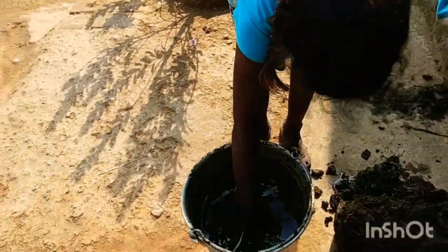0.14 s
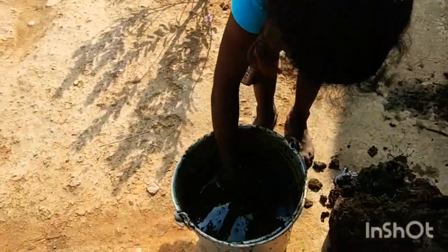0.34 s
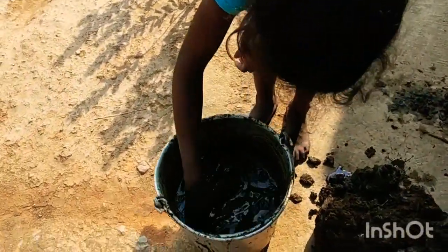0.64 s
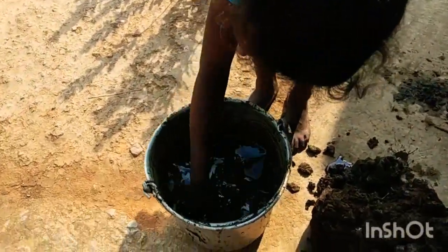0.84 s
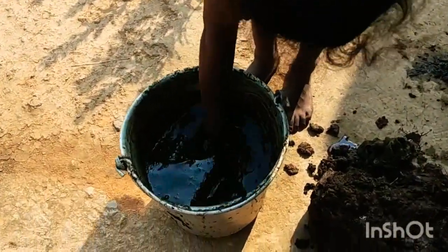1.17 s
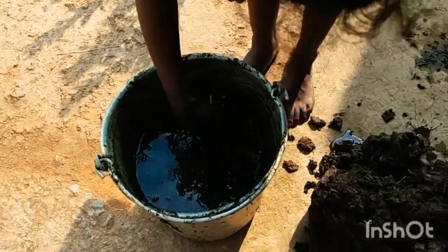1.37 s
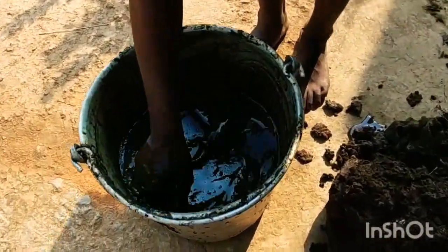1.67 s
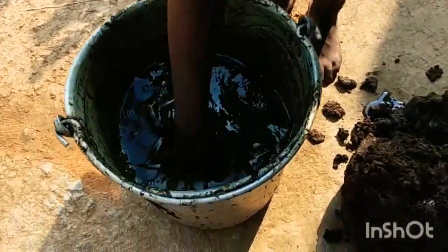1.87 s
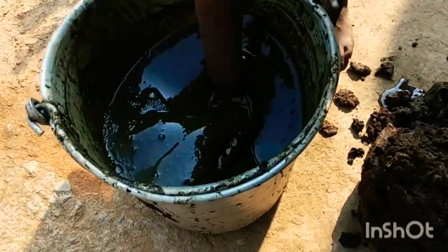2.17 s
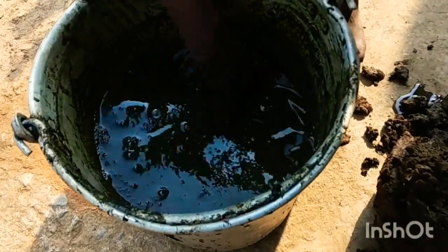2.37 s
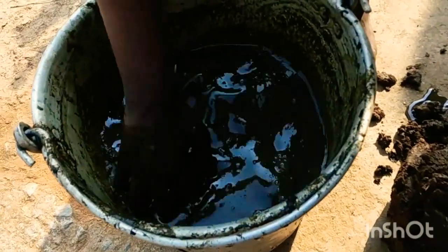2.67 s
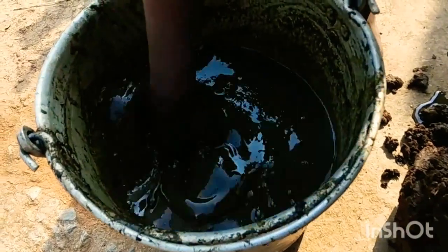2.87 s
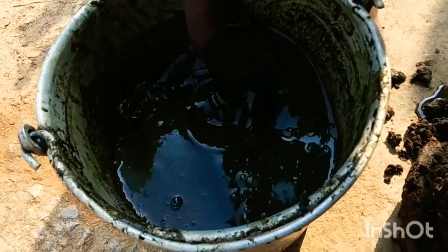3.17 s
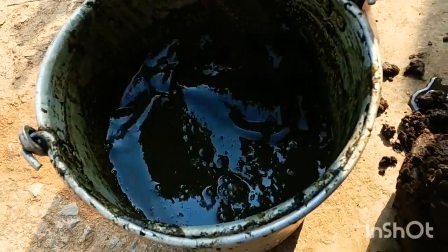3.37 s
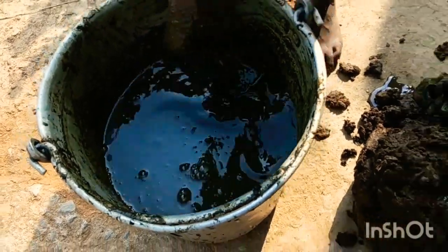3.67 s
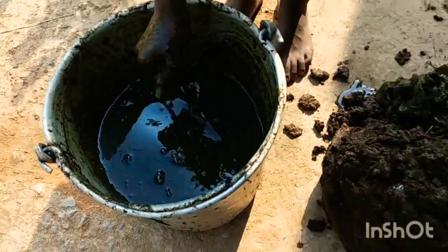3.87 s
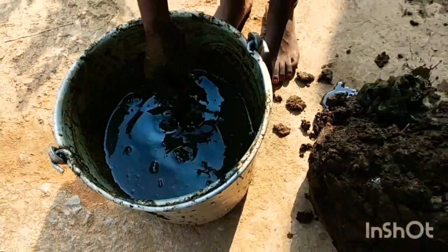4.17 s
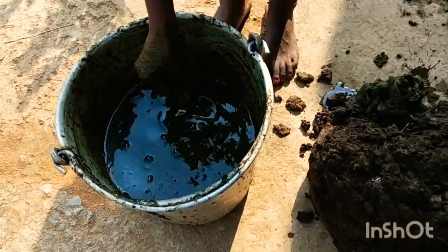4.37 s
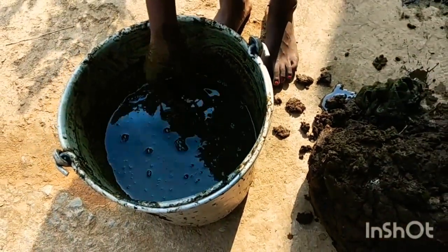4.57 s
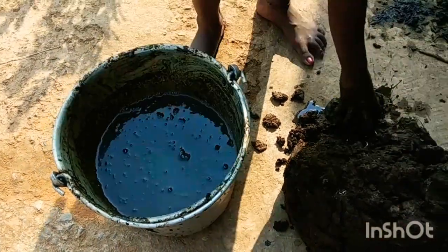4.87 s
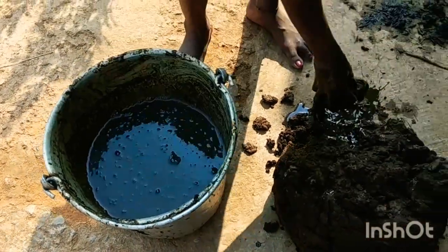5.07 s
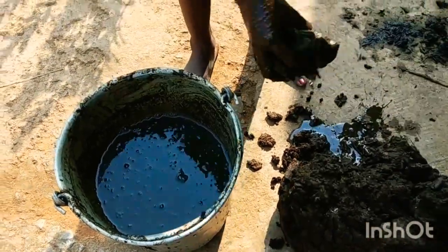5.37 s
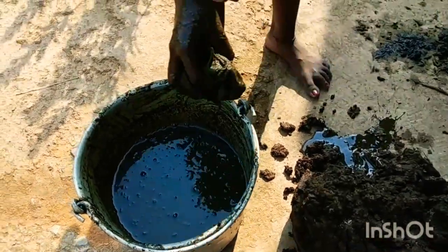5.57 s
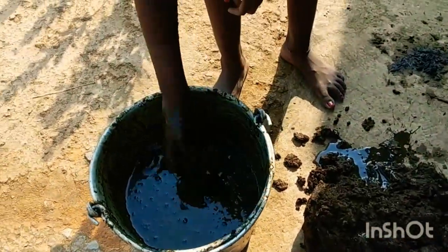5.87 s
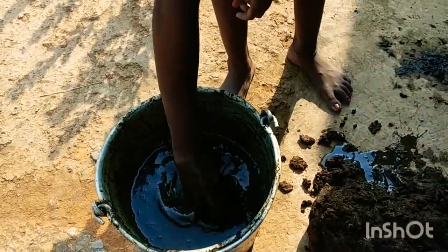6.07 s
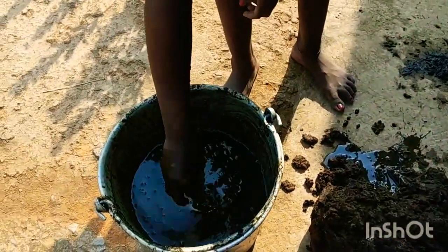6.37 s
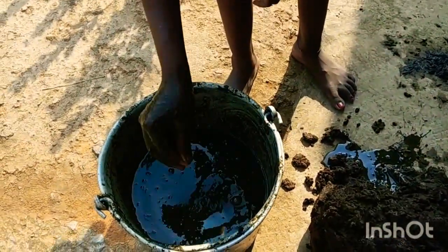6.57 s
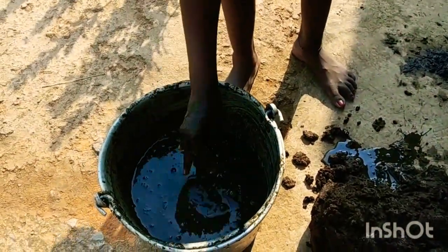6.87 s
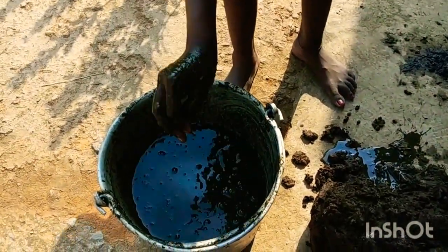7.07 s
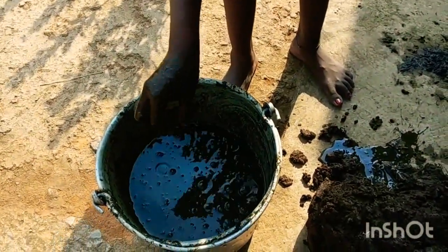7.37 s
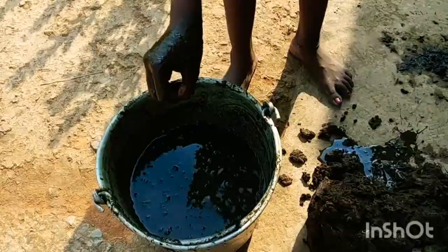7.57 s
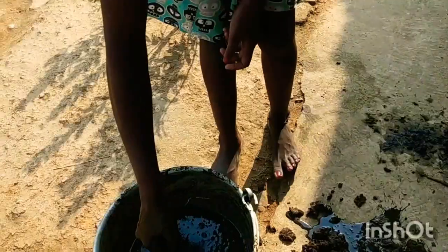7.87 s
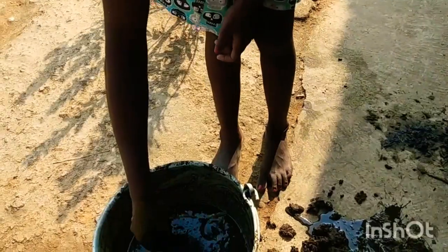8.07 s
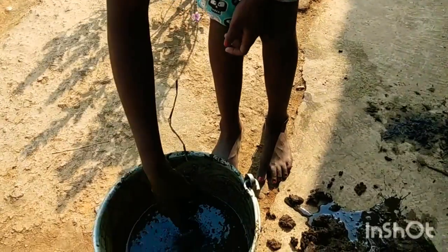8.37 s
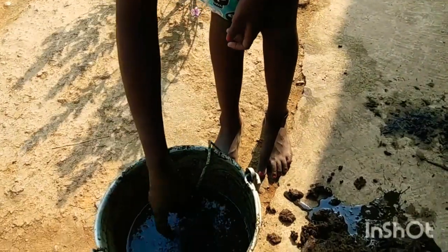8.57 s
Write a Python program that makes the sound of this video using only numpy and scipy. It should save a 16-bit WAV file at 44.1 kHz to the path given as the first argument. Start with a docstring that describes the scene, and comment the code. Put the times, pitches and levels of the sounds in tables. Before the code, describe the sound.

Close wet mud squishes, plops and spatters in a bucket, busiest in the first few seconds, then thins to faint ticks over distant engine and bird chirps.

```python
"""Wet mud squishes over open-air hiss and a far engine's thuds; then gulps, splats, squelches and sprays.
A hand stirs and scoops thick slurry in a bucket: noise bursts through resonances make films and cavities,
decaying sines make air pockets, dense ringing grains make froth and droplets; a short noise tail is the walls.
Behind it: shaped noise (air, hum), pulses (engine), gliding tones (a small bird), faint far tones, the last
two short, near 800 and 970 Hz.
"""
import sys
import numpy as np
from scipy import signal
from scipy.fft import rfft, irfft, next_fast_len
from scipy.io import wavfile
from scipy.ndimage import map_coordinates

SR = 44100
rng = np.random.default_rng(int(sys.argv[2]) if len(sys.argv) > 2 else 0)


def write(x):
    x = np.atleast_2d(x).T
    wavfile.write(sys.argv[1], SR, np.round(np.clip(x, -1, 1) * 32767).astype(np.int16))


N = 384552
TOP_HZ = 16000  # upper band limit


def amp(db):
    """Decibels to gain."""
    return 10 ** (np.asarray(db) / 20)


def unit(x):
    """Scale to rms 1."""
    return x / np.sqrt(np.mean(x ** 2) + 1e-20)


def along(points, hz):
    """Interpolate (frequency, value) points on a log frequency axis."""
    f, v = np.transpose(points)
    return np.interp(np.log(hz + 1), np.log(f + 1), v)


def curve(rows):
    """Interpolate (time, value) rows to one value per sample."""
    times, values = np.transpose(rows)
    return np.interp(np.arange(N) / SR, times, values)


def wobble(rate_hz):
    """Smooth random curve with rate_hz knots per second."""
    at = np.arange(0, N + 32, 32)
    knots = rng.standard_normal(int(N * rate_hz / SR) + 4)
    coarse = map_coordinates(knots, [at * rate_hz / SR], order=2)
    return np.interp(np.arange(N), at, coarse)


def filtered(x, response):
    """Apply a complex frequency response by FFT."""
    n = x.shape[-1]
    padded = next_fast_len(n + n // 40 + 256, True)
    gain = np.complex64(response(np.fft.rfftfreq(padded, 1 / SR)))
    return irfft(rfft(np.float32(x), padded) * gain, padded)[..., :n]


def coloured(x, spectrum):
    """Shape x by a dB spectrum; rms 1."""
    return unit(filtered(x, lambda hz: amp(along(spectrum, hz))))


def resonance(hz, centre_hz, q):
    """Band-pass response of one damped cavity, 1 at its centre."""
    damping = 1j * hz * centre_hz / q
    return damping / (centre_hz ** 2 - hz ** 2 + damping)


def add(out, time_s, sound):
    """Mix a sound into out at time_s."""
    part = out[..., max(round(time_s * SR), 0):][..., :sound.shape[-1]]
    part += sound[..., :part.shape[-1]]


# Left-right correlation: (frequency [Hz], likeness [0-1])
LIKENESS = [(25, 0.44), (60, 0.95), (120, 0.76), (300, 0.52), (700, 0.53), (1400, 0.044), (4000, 0.027)]


def spread(pair):
    """Two unrelated signals to stereo: alike in the bass, apart in the treble."""
    def mid_side(hz):
        turn = np.arccos(np.clip(along(LIKENESS, hz), -1, 1)) / 2
        return np.array([np.cos(turn), np.sin(turn)])
    mid, side = filtered(pair, mid_side)
    return np.array([mid + side, mid - side])


# Outdoor hiss spectrum: (frequency [Hz], relative level [dB])
HISS_SPECTRUM = [(20, 4.5), (65, -11.5), (96, 5.5), (150, -8.5), (260, -16), (340, -26.5), (450, -22),
                 (574, -18), (850, -21), (1200, -23), (3250, -25), (7000, -24.5), (13900, -25.5),
                 (16000, -32)]


def air(hiss_db=-54, rumble_db=-55):
    """Outdoor hiss and the low rumble of a light breeze: two shaped noises with wavering levels."""
    rumble_spectrum = [(8, -23), (20, -5), (52, -4.5), (80, -10.0), (300, -52)]
    hiss = coloured(rng.standard_normal((2, N)), HISS_SPECTRUM)
    rumble = coloured(rng.standard_normal((2, N)), rumble_spectrum)
    hiss = amp(hiss_db + 0.67 * wobble(2.4)) * hiss
    rumble = amp(rumble_db + 1.5 * wobble(4.4)) * rumble
    return spread(hiss + rumble)


# Hum level: (time [s], level [dB])
HUM_LEVEL = [(0, -86), (3.8, -79), (4.2, -72.5), (4.9, -69.5), (5.3, -75), (7, -72.5), (8.72, -86)]


def hum(centre_hz=560, q=18):
    """Faint far hum: narrow-band noise that wavers, swells and fades."""
    band = filtered(rng.standard_normal(N), lambda hz: resonance(hz, centre_hz, q) ** 2)
    return amp(curve(HUM_LEVEL)) * unit(band)


# Engine level: (time [s], level [dB])
ENGINE_LEVEL = [(0, -54.5), (3, -52.5), (5.7, -54.5), (7, -58.5), (8.72, -57.5)]
# Exhaust pulse spectrum: (frequency [Hz], relative level [dB])
EXHAUST_SPECTRUM = [(45, -6), (70, -12.5), (90, -1), (105, -10), (126, -0.5), (150, -13.5), (220, -26),
                    (400, -31.5), (900, -75)]


def engine(firing_hz=13.85, puff_gain=0.65, puff_s=0.039):
    """Distant single cylinder: each firing gives a dull thud and a decaying noise puff of exhaust."""
    turns = np.cumsum(firing_hz * (1 + 0.01185 * wobble(2))) / SR
    firings = np.diff(np.floor(turns), prepend=0) * amp(0.62 * wobble(24))
    thuds = coloured(firings, EXHAUST_SPECTRUM)
    puff_envelope = np.exp(-(turns % 1) / firing_hz / puff_s)
    puffs = coloured(puff_envelope * rng.standard_normal((2, N)), EXHAUST_SPECTRUM)
    return amp(curve(ENGINE_LEVEL)) * unit(thuds + puff_gain * spread(puffs))


# Faint far tones: (start [s], length [s], pitch [Hz], glide [octaves], relative level [dB],
# strongest overtone [Hz])
FAR_TONES = [(3.443, 0.3, 912, -0.031, -63, 900), (5.258, 0.53, 713, 0.065, -59, 700),
             (6.921, 0.57, 625, -0.1, -70, 1800), (7.28, 0.51, 613, -.08, -65, 1250),
             (7.3, 0.8, 607, -0.09, -67, 2300), (8.557, 0.16, 972, .01, -61, 1390),
             (8.569, 0.148, 803, -.05, -63.5, 820)]


def far_tones(gain_db=-2, q=3):
    """Faint far tones: gliding notes of five harmonics with randomly wavering phases."""
    out = np.zeros(N)
    harmonics = np.arange(1, 6)
    for start_s, length_s, pitch_hz, glide_oct, db, strongest_hz in FAR_TONES:
        u = np.linspace(0, 1, int(length_s * SR))
        phase = 2 * np.pi * np.cumsum(pitch_hz * 2 ** (glide_oct * u)) / SR
        waver = 1.5 * wobble(18)[:len(u)]
        envelope = amp(db + gain_db) * np.abs(np.sin(np.pi * u)) ** .5
        gains = np.abs(resonance(harmonics * pitch_hz, strongest_hz, q))
        for k, gain in zip(harmonics, gains / np.linalg.norm(gains)):
            blur = 1.03 * wobble(110.6)[:len(u)] + k * waver
            add(out, start_s, gain * envelope * np.sin(k * phase + blur))
    return out


# Bird's upward slurs: (start [s], relative level [dB], start pitch [Hz], length [s], rise [octaves],
# bend [exponent: under 1 levels off, over 1 turns up late])
BIRD_SLURS = [(.26, -64, 4000, 0.12, .33, 1.1), (0.972, -63, 4180, .13, 0.36, 2),
              (2.04, -62, 4350, 0.093, 0.29, 1.6), (2.38, -62, 4900, .08, .15, 1.2),
              (3.69, -70, 4700, .11, 0.18, 1.2), (4.48, -63, 4400, .12, .25, 2.3),
              (4.93, -61, 4380, 0.18, 0.43, 1.5), (5.21, -61, 4920, 0.091, .14, .9),
              (5.47, -60, 4800, 0.11, 0.18, 0.64), (5.89, -58, 4240, 0.1, 0.204, 2.04),
              (6.2, -59.5, 4780, .11, 0.19, 4), (6.75, -71, 4920, 0.15, 0.15, 1.2),
              (6.88, -64, 4050, 0.15, 0.53, 1.6), (8.15, -65, 4550, 0.2, 0.49, 2)]


def bird(flutter=0.015, blur=1.0, broken_db=3, gain_db=-1):
    """Small bird: thin rising sine notes, each with its own bend and a random quaver."""
    out = np.zeros(N)
    for start_s, db, start_hz, length_s, rise_oct, bend in BIRD_SLURS:
        u = np.linspace(0, 1, int(length_s * SR))
        quaver = flutter * map_coordinates(rng.standard_normal(80), [79 * u])
        pitch_hz = start_hz * (2 ** (rise_oct * u ** bend) + quaver)
        envelope = amp(db + gain_db) * np.abs(np.sin(np.pi * u)) ** .5
        add(out, start_s, envelope * np.sin(2 * np.pi * np.cumsum(pitch_hz) / SR))
    # scattered paths blur the note and break it up
    broken = amp(broken_db * np.tanh(wobble(60)))
    return out * broken * (1 + blur * np.array([wobble(300), wobble(300)]))


# Wall reverberation: (frequency [Hz], 60 dB decay [s])
WALL_DECAY = [(200, 0.1), (600, 0.21), (2000, 0.065), (12000, 0.046)]


def bucket(x):
    """Bucket walls throw sound back and forth: convolve with noise whose decay depends on frequency."""
    hz, t, bins = signal.stft(rng.standard_normal((2, SR // 6)), SR, nperseg=128)
    decay = amp(-60 * t / along(WALL_DECAY, hz)[:, None])
    tail = signal.istft(bins * decay, SR, nperseg=128)[1]
    tail = spread(np.pad(tail, ((0, 0), (64, 0))))  # 64 samples of pre-delay
    return signal.fftconvolve(x, tail / np.linalg.norm(tail[0]), axes=1)[:, :N]


def comb(hz, delay_s=0.0007, copy_db=-6):
    """Comb colouring: one short delayed copy, random delay per sound and channel."""
    delays_s = delay_s * (.5 + rng.random((2, 1)))
    return 1 + amp(copy_db) * np.exp(-2j * np.pi * hz * delays_s)


def grains(count, low_hz, high_hz, cycles, scatter_db):
    """Tiny ringing bubbles at random moments, pitches and sizes; two channels differ in phase only."""
    when, place, size, *phases = rng.random((count, 5)).T[..., None]
    pitch_hz = low_hz * (min(high_hz, TOP_HZ) / low_hz) ** place
    k = np.arange(int(.5 * cycles * SR / low_hz))
    age = np.float32(k) * np.float32(pitch_hz / SR)  # [cycles]
    strength = np.float32(amp(-scatter_db * np.log(size + .04)))
    decay = np.exp(age * np.float32(-np.log(1000) / cycles))
    envelope = strength * decay * np.minimum(2 * age, 1)
    at = ((when * N).astype(int) + k).ravel()
    trains = []
    for phase in phases:
        rings = envelope * np.sin(2 * np.pi * (age + np.float32(phase)))
        trains.append(np.bincount(at, rings.ravel(), N)[:N])
    return unit(np.array(trains))


def bubbling(x, spectrum):
    """Grains under a spectrum; the treble tilt makes up for small bubbles dying sooner."""
    return unit(filtered(x, lambda hz: hz / SR * amp(along(spectrum, hz))))


# Froth activity: (time [s], relative level [dB])
FROTH_LEVEL = [(0, -69), (2.3, -66.5), (3.1, -61), (3.7, -61), (5.1, -61), (6.1, -62), (6.7, -74.5),
               (7.4, -62.5), (8.72, -66.5)]
# Hand pushes: (time of peak speed [s], half length [s], relative slosh [dB], relative squish [dB])
HAND_PUSHES = [(0, 0.047, -77, -46), (0.127, 0.029, -53, -44.5), (0.232, 0.029, -54, -53),
               (0.525, 0.12, -57.5, -53), (0.722, 0.085, -61.5, -55.5), (0.938, 0.11, -55.5, -60.5),
               (1.145, 0.095, -55.5, -49), (1.578, 0.22, -54.5, -48.5), (1.866, 0.1, -53.5, -54),
               (2.184, 0.055, -52, -52), (2.503, 0.094, -46.5, -50), (2.91, 0.14, -55, -53.5),
               (3.375, 0.15, -66, -57), (3.572, 0.02, -50, -51.5), (3.946, 0.17, -70, -59),
               (5.65, 0.064, -57.5, -57), (6.016, 0.057, -77, -53.5), (6.543, 0.22, -61, -75),
               (7.676, 0.095, -65.5, -59.5)]
SLOSH_REST_DB, SQUISH_REST_DB = -67, -68  # slurry settling between pushes, before layer gains


def stirring(rise=0.91, fall=1.44, froth_db=-6, swell_db=6.0):
    """Gains of slosh, squish and fizz: each push swells, ebbs and whips up some froth."""
    t = np.arange(N, dtype=np.float32) / SR
    slosh, squish = np.zeros(N), np.zeros(N)
    for peak_s, half_s, slosh_db, squish_db in HAND_PUSHES:
        u = (t - peak_s) / half_s
        speed = np.exp(-np.minimum((u / np.where(u < 0, rise, fall)) ** 2, 20))
        slosh += amp(slosh_db) * speed
        squish += amp(squish_db) * speed
    steady_froth = amp(curve(FROTH_LEVEL) + swell_db * wobble(9.7))
    fizz = np.hypot(steady_froth, amp(froth_db) * squish)
    return np.hypot(slosh, amp(SLOSH_REST_DB)), np.hypot(squish, amp(SQUISH_REST_DB)), fizz


# Spectra of large pockets, sliding mud and froth: (frequency [Hz], relative level [dB])
SLOSH_SPECTRUM = [(110, -23), (180, 1.5), (300, 0.5), (393, -6.5), (555, -4.5), (718, -11.5), (1060, -18.5),
                  (1500, -14), (1950, -24), (3300, -120)]
SQUISH_SPECTRUM = [(600, -12.5), (1100, -8.5), (2000, -8), (3500, -12), (6000, -16)]
FIZZ_SPECTRUM = [(1760, -42), (3000, -7), (3910, -5.5), (6390, 1), (7000, -3), (11200, -8), (13700, -10.5),
                 (15300, -16), (16000, -1)]


def churn(slosh_db=-1, squish_db=-2, fizz_db=-2, sliding_db=1):
    """Small pockets of many sizes keep bursting (grains) while wet mud slides over skin (noise)."""
    slosh, squish, fizz = stirring()
    sliding = rng.standard_normal((2, N))
    pockets = grains(count=2200, low_hz=199, high_hz=1430, cycles=6, scatter_db=1.5)
    pores = grains(count=2600, low_hz=865, high_hz=4020, cycles=25, scatter_db=5.5)
    froth = grains(count=7000, low_hz=3532, high_hz=17100, cycles=200, scatter_db=8)
    low = bubbling(pockets, SLOSH_SPECTRUM)
    middle = unit(bubbling(pores, SQUISH_SPECTRUM) + amp(sliding_db) * coloured(sliding, SQUISH_SPECTRUM))
    high = unit(bubbling(froth, FIZZ_SPECTRUM) + coloured(sliding, FIZZ_SPECTRUM))
    low = slosh * amp(slosh_db) * low
    middle = squish * amp(squish_db) * middle
    high = fizz * amp(fizz_db) * high
    return spread(low + middle + high)


def bubble(pitch_hz, t60_s, climb_oct_s, attack_s):
    """Ringing air pocket: decaying sine of peak 1, gliding in pitch."""
    t = np.arange(SR // 6) / SR
    glide = 2 ** (climb_oct_s * np.minimum(t, t60_s))
    phase = 2 * np.pi * np.cumsum(pitch_hz * glide) / SR
    ring = np.sin(phase) * amp(-60 * t / t60_s) * (1 - np.exp(-t / attack_s))
    return ring / np.abs(ring).max()


# Hand plunging in: (time [s], peak level [dB], pitch [Hz])
HAND_PLUNGES = [(0.121, -32, 70.6), (1.697, -44, 110)]


def plunges(t60_s=0.044, attack_s=0.0014):
    """Whole slurry mass gives way: one soft thump, a short low sine."""
    out = np.zeros(N)
    for time_s, db, pitch_hz in HAND_PLUNGES:
        add(out, time_s, amp(db) * bubble(pitch_hz, t60_s, 0, attack_s))
    return out


# Shrinking pockets: (time [s], relative level [dB], start pitch [Hz], length [s], rise [octaves])
FILLING_POCKETS = [(0.477, -46.5, 766, 0.046, 1), (2.432, -45, 722, 0.032, 0.65),
                   (2.506, -49, 830, .032, .5), (2.585, -52, 762, .035, 0.75),
                   (3.323, -46.5, 695, 0.032, 0.88)]


def slurps(bend=1.76, gain_db=-1, overtone_db=-11):
    """Mud fills a pocket: its pitch climbs ever faster until it closes."""
    out = np.zeros(N)
    for time_s, db, pitch_hz, length_s, rise_oct in FILLING_POCKETS:
        u = np.linspace(0, 1, int(length_s * SR))
        phase = 2 * np.pi * np.cumsum(pitch_hz * 2 ** (rise_oct * u ** bend)) / SR
        tone = np.sin(phase) + amp(overtone_db) * np.sin(2 * phase)
        add(out, time_s, amp(db + gain_db) * np.sin(np.pi * u) * tone)
    return out


# Round bubbles: (time [s], relative level [dB], pitch [Hz], glide [octaves/s])
ROUND_BUBBLES = [(0.093, -34, 1426, -6), (.1005, -30.5, 1460, 0), (.11, -29, 2100, 3),
                 (.124, -40.5, 888, 3), (.333, -37.5, 453, 3), (1.614, -35, 1090, 2),
                 (1.781, -31.5, 1420, 4), (1.859, -27, 534, 3), (1.94, -36.5, 520, 4),
                 (2.467, -31, 1970, 0), (2.498, -27, 515, -1.5), (2.55, -28.5, 868, -8.5),
                 (2.752, -30.5, 1249, 2), (2.911, -36, 1360, -8), (3, -31, 1064, -1),
                 (3.009, -35, 567, 1.5), (3.148, -41.5, 830, 6), (3.19, -40, 450, 0.5),
                 (3.226, -25, 439, -1.8), (6.054, -39, 930, -3)]


def bubbles(cycles=36, gain_db=-2):
    """Round pockets in the thin top layer plop clearly, falling 60 dB in a set number of cycles."""
    out = np.zeros(N)
    for time_s, db, pitch_hz, climb_oct_s in ROUND_BUBBLES:
        t60_s = cycles / pitch_hz
        plop = bubble(pitch_hz, t60_s, climb_oct_s, attack_s=t60_s / 12)
        add(out, time_s, amp(db + gain_db) * plop)
    return out


# Hand slapping the surface: (time [s], peak level before stereo spread [dB])
HAND_SLAPS = [(1.744, -34), (2.9985, -27.5), (3.225, -30.5)]


def slaps(centre_hz=1300, q=1.0, t60_s=0.029):
    """Flat skin meets wet mud: a short dull clap of resonant noise with an instant start."""
    out, t = np.zeros((2, N)), np.arange(SR // 25) / SR
    for time_s, db in HAND_SLAPS:
        burst = rng.standard_normal((2, len(t))) * amp(-60 * t / t60_s)
        clap = filtered(burst, lambda hz: resonance(hz, centre_hz, q))
        add(out, time_s, amp(db) * clap / np.abs(clap).max())
    return spread(out)


# Opening cavities: (time [s], relative level [dB], pitch [Hz])
MUD_CAVITIES = [(0.093, -34, 1510), (0.106, -35.5, 2050), (0.1235, -31.5, 2400), (0.217, -47, 1760),
                (0.4894, -40, 885), (0.5185, -27.5, 1710), (0.702, -37, 1210), (1.4155, -36, 1000),
                (1.6146, -37.5, 1110), (1.758, -30, 2900), (1.766, -30.5, 1070), (1.852, -29, 1200),
                (1.875, -28, 2840), (2.4676, -31, 1930), (2.4956, -28.5, 1040), (2.6876, -33, 2760),
                (2.7498, -25, 1256), (2.901, -33, 3470), (2.9104, -32, 1270), (2.9982, -33, 1160),
                (3.297, -38, 3200), (3.442, -40, 1980), (3.5572, -23.5, 2500), (4.214, -46.5, 1400),
                (6.0068, -46, 2220), (6.0536, -43, 1210), (6.289, -50.5, 2020)]


def squelches(q=7, broad_q=0.19, attack_s=0.0021, t60_s=0.021, gain_db=5.5):
    """Sticky mud crackles into the small cavity it uncovers: decaying noise through a resonance."""
    out, t = np.zeros((2, N)), np.arange(SR // 8) / SR
    for time_s, db, pitch_hz in MUD_CAVITIES:
        envelope = amp(-60 * t / t60_s) * (1 - np.exp(-t / attack_s))
        tearing = rng.standard_normal((2, len(t))) * envelope
        ring = filtered(tearing, lambda hz: resonance(hz, pitch_hz, q) * resonance(hz, pitch_hz, broad_q))
        add(out, time_s, amp(db + gain_db) * ring / np.abs(ring).max())
    return spread(out)


# Runs of pockets folding shut behind the hand: (time [s], first level [dB], first pitch [Hz],
# run length [s])
POCKET_RUNS = [(.559, -33, 428, .04), (.834, -38.5, 405, .04), (.91, -39, 486, .06), (1.512, -32, 440, .02),
               (1.535, -29.5, 460, .02), (1.556, -41, 325, .02), (1.629, -33, 523, .02),
               (1.741, -35.5, 293, .02), (1.899, -27.5, 487, .02), (1.922, -36, 450, .04),
               (1.984, -36, 470, .02), (2.003, -39, 333, .04), (2.155, -36, 493, .02),
               (2.176, -33.5, 487, .02), (2.247, -39.5, 610, .02), (2.392, -28.5, 483, .02),
               (2.462, -35.5, 480, .02), (2.495, -32, 807, .02), (2.549, -40.5, 504, .06),
               (2.681, -32.5, 474, .02), (2.749, -38.5, 546, .02), (2.874, -45, 380, .02),
               (2.922, -31.5, 418, .06), (3.008, -37, 560, .02), (3.048, -40.5, 378, .04),
               (3.145, -39.5, 416, .02), (3.763, -45.5, 400, .02), (6.184, -48.5, 470, .02),
               (6.232, -49.5, 470, .02), (6.361, -44.5, 400, .04), (6.475, -35, 406, .02),
               (6.503, -39, 380, .02), (6.57, -40.5, 407, .02), (6.601, -40.5, 412, .02),
               (6.681, -44.5, 334, .02)]


def gulp_runs(gap_s=.022, fade_db=-1.5, sink_ratio=0.775):
    """Expand runs to (time, level, pitch) rows, each pocket weaker and deeper than the last."""
    rows = []
    for time_s, db, pitch_hz, length_s in POCKET_RUNS:
        for k in range(int(np.ceil(length_s / gap_s))):
            rows.append((time_s + k * gap_s, db + k * fade_db, pitch_hz * sink_ratio ** k))
    return rows


# Pocket shutting: (frequency [Hz], relative level [dB])
SMACK_SPECTRUM = [(100, 5), (240, 2), (550, -1), (800, -11.5), (1150, -5.5), (2000, -21.5), (4000, -32),
                  (9000, -50)]


def gulps(cycles=7, after_db=-11.0, after_s=.035, smack_db=-7.0, smack_t60_s=0.053,
          swell_s=0.00287, climb_oct_s=8):
    """A big pocket swells and dies within a few cycles, smacks shut and breaks into smaller ones."""
    out, t = np.zeros(N), np.arange(SR // 12) / SR
    swell = (t / swell_s) ** 3 * np.exp(3 * (1 - t / swell_s))
    for time_s, db, pitch_hz in gulp_runs():
        phase = 2 * np.pi * np.cumsum(pitch_hz * 2 ** (climb_oct_s * t)) / SR
        add(out, time_s, amp(db) * swell * np.sin(phase))
        smack = coloured(rng.standard_normal(len(t)), SMACK_SPECTRUM) * amp(-60 * t / smack_t60_s)
        add(out, time_s + .002, amp(db + smack_db) * smack)
        for when, size in zip(rng.random(4), rng.standard_normal(4)):
            small_hz = pitch_hz * np.exp(0.44 * size)
            small = bubble(small_hz, cycles / small_hz, climb_oct_s=8, attack_s=.001)
            add(out, time_s + swell_s + after_s * when, amp(db + after_db - 5 * when) * small)
    return out


# Slurry sheets pouring back: (start [s], end [s], level [dB], pitch of the hollow under it [Hz])
FALLING_SHEETS = [(0.087, 0.169, -51, 2400), (0.519, 0.537, -44, 3500), (0.676, 0.769, -46, 4800),
                  (1.076, 1.262, -48.5, 5700), (1.634, 1.703, -37, 6360), (1.759, 1.801, -35.5, 5530),
                  (1.846, 1.894, -28, 5860), (2.475, 2.561, -48, 5600), (2.681, 2.828, -37.5, 6800),
                  (2.704, 2.73, -42, 7200), (2.746, 2.79, -29, 6860), (4.086, 4.136, -48.5, 3920),
                  (5.629, 5.715, -52, 5900), (7.667, 7.687, -46, 12000)]
# Droplet spectrum, also under the splats: (frequency [Hz], relative level [dB])
SPRAY_SPECTRUM = [(700, -27), (1200, -12), (2500, -2.5), (3500, -1.5), (6700, 0), (9000, 2), (11400, 2.5),
                  (12500, -0.5), (14200, 7), (16500, -14)]


def sprays(q=4, broad_db=-5, clump_db=3, clump_rate_hz=170):
    """Falling sheets break into uneven clumps of droplets, coloured by the hollow under each."""
    out = np.zeros((2, N))
    drops = grains(count=30000, low_hz=1660, high_hz=16700, cycles=11.6, scatter_db=3.5)
    drops = bubbling(drops, SPRAY_SPECTRUM) * amp(clump_db * np.tanh(wobble(clump_rate_hz)))
    for start_s, end_s, db, pitch_hz in FALLING_SHEETS:
        length_s = end_s - start_s
        u = np.linspace(-.08, 1.2, int(1.28 * length_s * SR))  # fades reach past both ends
        flow = np.interp(u, [-.08, .15, .7, 1.2], [0, 1, .9, 0])
        first = int(rng.random() * (N - len(u)))
        excerpt = drops[:, first:first + len(u)]
        sheet = filtered(excerpt, lambda hz: (resonance(hz, pitch_hz, q) + amp(broad_db)) * comb(hz))
        add(out, start_s - .08 * length_s, amp(db) * flow * unit(sheet))
    return out


# Bursting bubble skins: (time [s], level [dB], pitch [Hz], left-right [dB])
BUBBLE_SKINS = [(0.6, -31.5, 3460, -3), (0.8236, -18.5, 11060, 7), (2.4652, -4.5, 7400, -4),
                (2.8995, -24.5, 3830, -4), (3.558, -28, 2550, 1), (4.7012, -26, 7150, 2),
                (5.6126, -27, 14500, 6), (7.675, -30, 11600, -3)]


def pops(cycles=11, port_turns=0.41):
    """A taut skin bursts: one sharp crack, its tiny cavity ringing for a few cycles."""
    out, t = np.zeros((2, N)), np.arange(SR // 100) / SR
    for time_s, db, pitch_hz, pan_db in BUBBLE_SKINS:
        age = t * pitch_hz / cycles
        turns = pitch_hz * t + port_turns * rng.random((2, 1))
        crack = age * np.exp(-np.log(1000) * age) * np.sin(2 * np.pi * turns)
        sides_db = np.array([[pan_db], [-pan_db]]) / 2
        add(out, time_s, amp(db + sides_db) * crack / np.abs(crack).max())
    return out


def spits(count=26, over_froth_db=22.0, scatter_db=3, centre_hz=9500):
    """Stray snaps, levels following the froth: (time, level, pitch, left-right) rows."""
    when, size, place, side = rng.random((count, 4)).T
    times_s = (np.arange(count) + when) / count * N / SR
    froth_db = np.interp(times_s, *np.transpose(FROTH_LEVEL))
    db = froth_db + over_froth_db + scatter_db * (2 * size - 1)
    return list(zip(times_s, db, centre_hz * 2 ** (place - .5), 10 * (side - .5)))


# Films snapping and drops landing: (time [s], relative level [dB], pitch [Hz], left-right [dB])
FILMS_AND_DROPS = [(0.1233, -25.5, 14400, 6), (.5144, -28, 2680, 5), (0.5269, -24.5, 5300, -1),
                   (0.5997, -24.5, 3220, 0), (0.722, -31, 4770, -7), (0.8223, -29, 11260, 6.5),
                   (.9622, -37, 10400, 8), (1.4052, -28, 7950, 2), (1.415, -27, 3470, 2),
                   (1.5802, -18.5, 5280, -1), (1.7583, -13.5, 7840, 3), (1.769, -16.5, 5040, -1),
                   (1.7824, -24, 4900, 1), (1.8513, -12.5, 6550, -1), (1.876, -9, 9100, -2),
                   (2.465, -11.5, 6400, 9.5), (2.479, -24, 5030, -8), (2.534, -23.5, 6300, -1),
                   (2.55, -27, 14400, 5), (2.6868, -13.5, 5650, 0), (2.7076, -15, 7140, 0),
                   (2.7248, -25, 7180, 11), (2.749, -10, 6500, -2), (2.778, -6, 11470, 1.5),
                   (2.8009, -20, 6500, 4), (2.9002, -25, 3900, -11), (2.908, -29, 6800, 7),
                   (2.929, -17, 16000, -2), (3.012, -27, 9200, 2), (2.998, -36, 2560, -7),
                   (3.384, -21.5, 6800, 1), (3.559, -18.5, 4120, -0.5), (3.918, -29.5, 6600, -1),
                   (4.103, -29.5, 2920, -10.5), (4.213, -27.5, 5600, 1.5), (4.563, -33, 10400, -2),
                   (4.6685, -30, 13500, -1), (4.702, -34.5, 7000, 2), (4.907, -31, 7600, -2),
                   (5.075, -26.5, 6300, 4), (5.257, -26, 12900, 2), (5.6109, -23.5, 15400, 1),
                   (5.892, -35, 4560, 2), (5.977, -26, 6050, 2), (6.0537, -28.5, 13300, 3),
                   (6.2652, -30.5, 11000, 4), (7.318, -31, 11500, 1), (7.675, -24.5, 11200, 6.5)]


def splats(q=5, broad_db=-11, gain_db=-6, ring_cycles=70, ring_db=-10, stretch_db=-20, tail_db=-21):
    """A film tears in noisy micro-clicks round one pitch, frees tiny bubbles and trails fine spatter."""
    out, t = np.zeros((2, N)), np.arange(SR // 10) / SR
    lead_s, tail_t60_s, rise_s, fall_s = .012, .06, .0012, .0015
    late = t - lead_s - .0013
    after = np.maximum(late, 0)
    # the film stretches and crackles, then gives way
    stretch = (late < 0) * amp(stretch_db) * np.exp(-np.abs(late) / 0.00067)
    burst = np.exp(np.minimum(late / rise_s, -late / fall_s))
    spatter = (late > 0) * amp(tail_db - 60 * after / tail_t60_s)
    envelope = burst + stretch + spatter
    for time_s, db, pitch_hz, pan_db in FILMS_AND_DROPS + spits():
        def colour(hz):
            broad = amp(broad_db + along(SPRAY_SPECTRUM, hz))
            return (resonance(hz, pitch_hz, q) + broad) * comb(hz)
        sound = filtered(envelope * rng.standard_normal((2, len(t))), colour)
        sound *= np.linalg.norm(envelope) / np.linalg.norm(sound, axis=1, keepdims=True)
        for size, *phases in rng.standard_normal((4, 3)):
            tiny_hz = min(pitch_hz * np.exp(0.326 * np.tanh(size) - .03), TOP_HZ)
            ring = amp(ring_db - 60 * after * tiny_hz / ring_cycles) * (1 - np.exp(-after / 0.00076))
            sound += ring * np.sin(2 * np.pi * (tiny_hz * after + np.c_[phases]))
        sides_db = np.array([[pan_db], [-pan_db]]) / 2
        add(out, time_s - lead_s, amp(db + gain_db + sides_db) * sound)
    return out


# Microphone port balance: (frequency [Hz], left-right [dB])
PORT_BALANCE = [(500, -0.5), (1300, 1), (2500, -1), (3600, -4), (5000, 5.5), (6500, 4), (8500, 5.5),
                (11000, 9), (14000, 8)]


def scene(wet_db=-7.0, plop_wet_db=-15):
    """Slurry in its bucket over the far sounds of the yard."""
    background = air() + hum() + engine() + far_tones() + bird()
    slurry = churn() + slaps() + squelches() + gulps() + sprays()
    # each microphone port favours its own bands
    slurry = filtered(slurry, lambda hz: amp(np.array([[1], [-1]]) * along(PORT_BALANCE, hz) / 2))
    slurry = slurry + pops() + splats()
    plops = plunges() + slurps() + bubbles()
    walls = bucket(amp(wet_db) * slurry + amp(plop_wet_db) * plops)
    return background + walls + plops + slurry


def record(dry):
    """Round off the highest peaks, then cut everything from the band limit up."""
    rounded = dry / (1 + np.abs(dry / .85) ** 4) ** .25
    return filtered(rounded, lambda hz: hz < TOP_HZ)


dry = scene()
out = record(dry)
write(out)
```